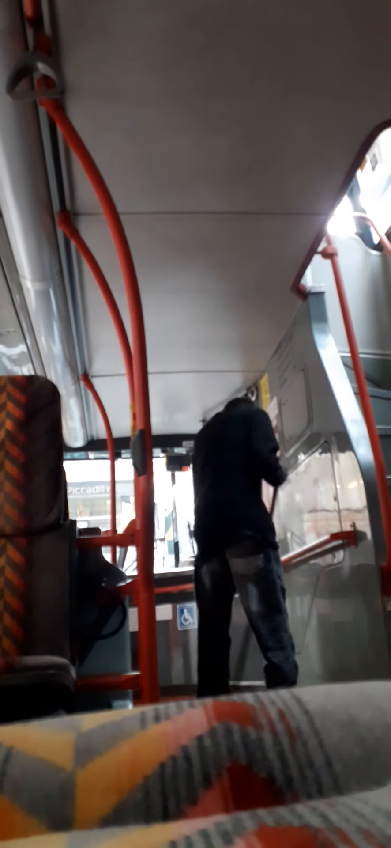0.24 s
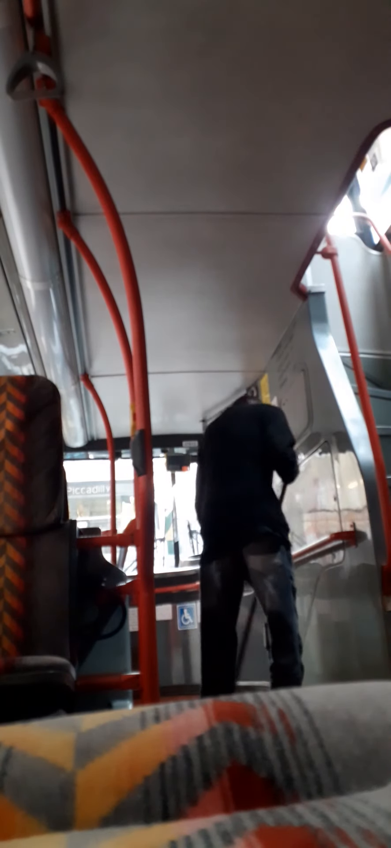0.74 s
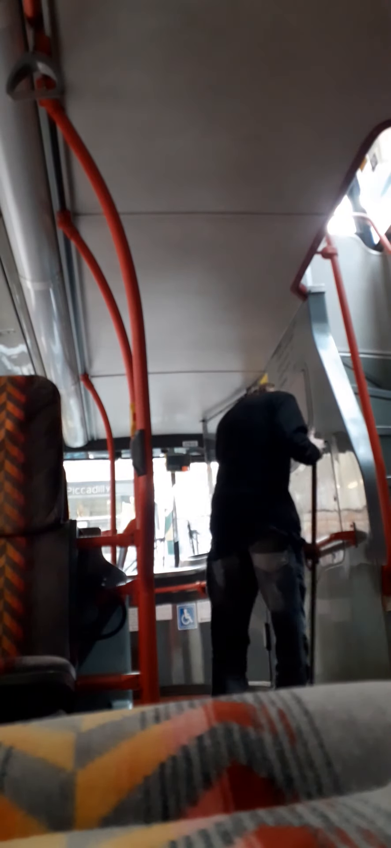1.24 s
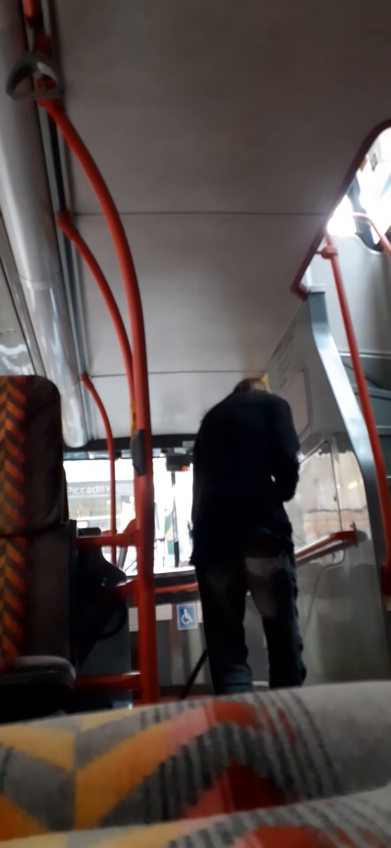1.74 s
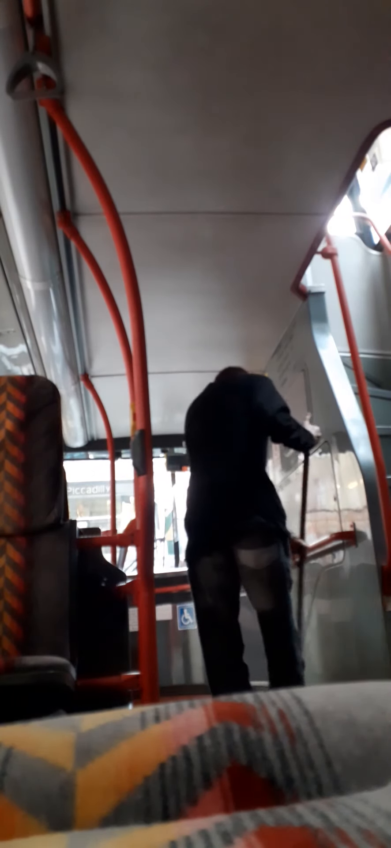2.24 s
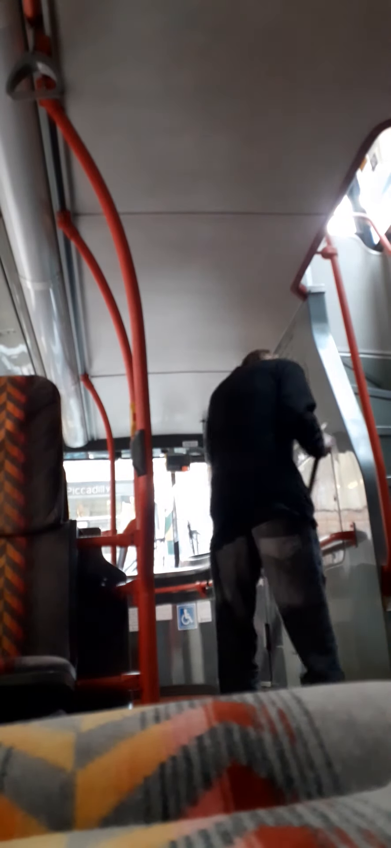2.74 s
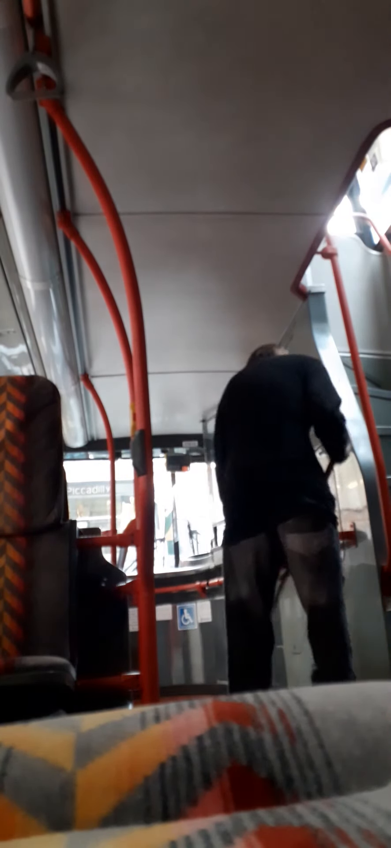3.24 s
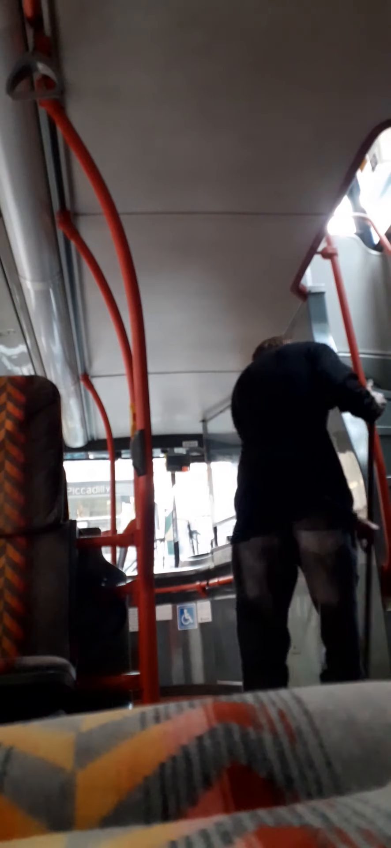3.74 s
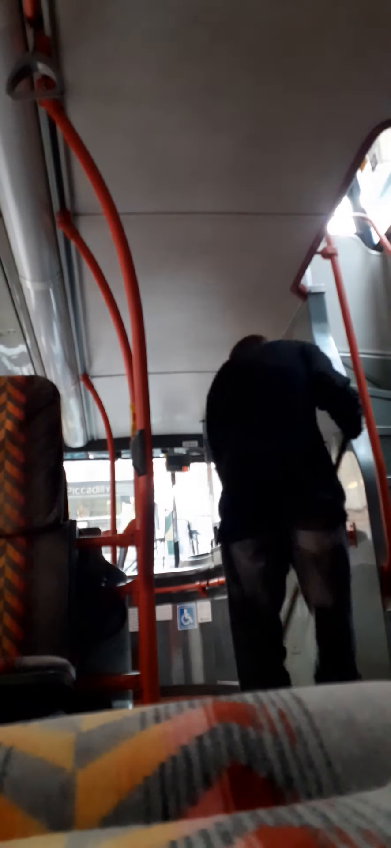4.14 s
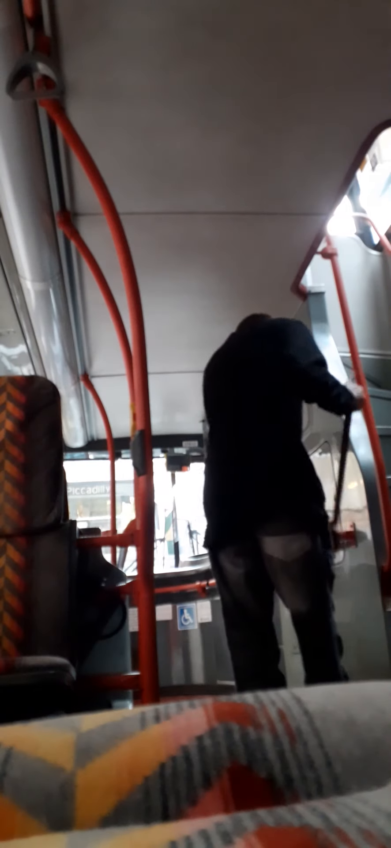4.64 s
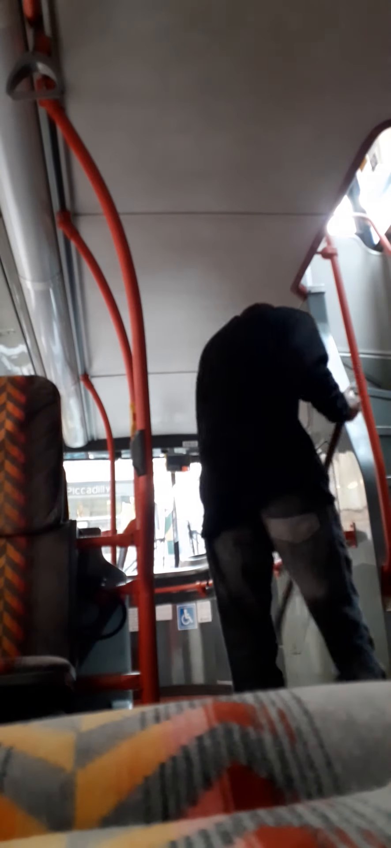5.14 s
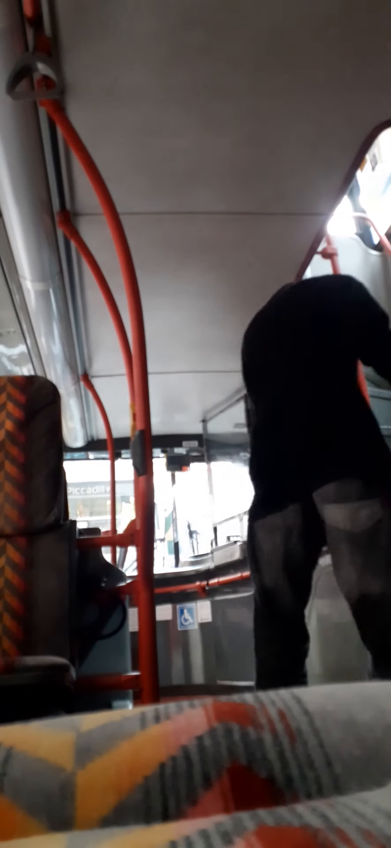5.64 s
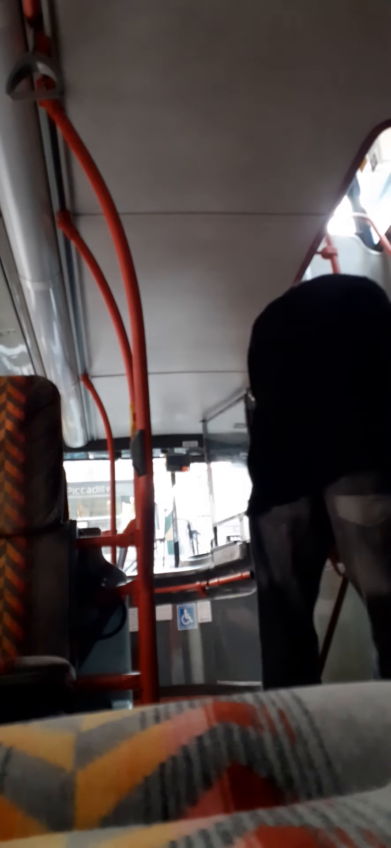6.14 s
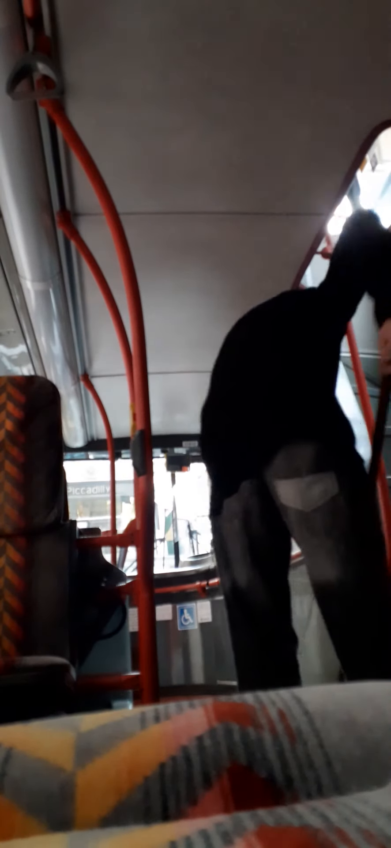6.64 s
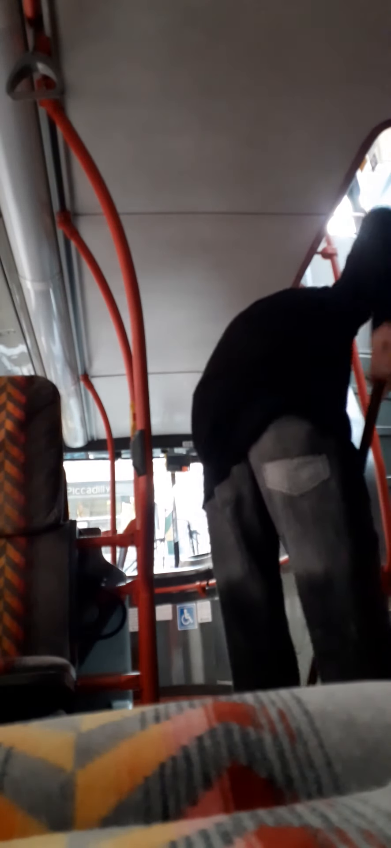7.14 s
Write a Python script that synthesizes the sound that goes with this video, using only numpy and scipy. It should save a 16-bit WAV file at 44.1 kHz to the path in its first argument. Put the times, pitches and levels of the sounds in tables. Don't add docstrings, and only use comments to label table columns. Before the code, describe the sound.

In a still bus cabin with a faint air noise and short, dull echo, a long-handled brush scrubs a wet, gritty floor. From 0 to 3.5 seconds the strokes are quiet and distant, about two per second: soft bristle hiss, a rougher mid scrape, and low hollow rubbing of floor and wall panels, dipping at each turn. Around 3.7 seconds come a few small clicking jolts and squeaks; a calmer stretch follows from 4 to 5. At 5.2 a sharper rattle rings out, and at 5.65 a stronger, nearer scrape with low floor groan. Knocks thump at 5.9, 6.4 and 6.65. At 6.75 the head bites suddenly, very loud, with hiss, scrape, booming panels and brief squeals, trailing off by 7. After a short lull with weight-shift rumble, another loud scrape and rattling jolts hit from 7.3 to the end. Close phone stereo, slightly brighter on the left.

```python
import sys
import numpy as np
from scipy import signal
from scipy.fft import rfft, irfft, next_fast_len
from scipy.io import wavfile
from scipy.ndimage import uniform_filter1d, map_coordinates

SR = 44100
rng = np.random.default_rng(int(sys.argv[2]) if len(sys.argv) > 2 else 0)


def waveform_to_disk(signal):
    frames = np.transpose(np.atleast_2d(signal))
    scaled = np.clip(frames, -1, 1) * 32767
    samples = np.round(scaled).astype(np.int16)
    wavfile.write(sys.argv[1], SR, samples)


def linear_from_db(decibels):
    return 10 ** (np.asarray(decibels, float) / 20)


N = 326335
CONTROL_RATE = 1000


def unit(x):
    return x / np.sqrt(np.mean(x ** 2) + 1e-20)


def along(points, hz):
    f, v = np.transpose(points)
    return np.interp(np.log(hz + 1), np.log(f + 1), v)


def over_time(points):
    s, value = np.transpose(points)
    return np.interp(np.arange(N) / SR, s, value)


def per_sample(control):
    return np.interp(np.arange(N) * CONTROL_RATE / SR, np.arange(len(control)), control)


def wobble(rate):
    knots = rng.standard_normal(int(N * rate / SR) + 4)
    return map_coordinates(knots, [np.arange(N) * rate / SR])


def filtered(x, response):
    m = next_fast_len(N + SR // 2)
    return irfft(rfft(x, m) * response(np.fft.rfftfreq(m, 1 / SR)), m)[..., :N]


def coloured(x, points):
    return filtered(x, lambda f: linear_from_db(along(points, f)))


def slips(rate, spread_db, smooth):
    size = linear_from_db(spread_db * np.clip(rng.standard_normal((2, N)), -2, 2)) * rng.choice([-1, 1], (2, N))
    train = size * (rng.random((2, N)) < rate / SR)
    return unit(train) + smooth * rng.standard_normal((2, N))


def patchy(x, depth_db):
    z = signal.stft(x, nperseg=512)[2]
    field = uniform_filter1d(rng.standard_normal(z.shape[1:]), 5, 0)
    field = uniform_filter1d(field, 8, 1)
    return signal.istft(z * linear_from_db(depth_db * unit(field)), nperseg=512)[1][:, :N]


def steadied(x, span_s, share):
    power = np.abs(uniform_filter1d(unit(x) ** 2, int(span_s * SR), axis=-1))
    return unit(x / np.sqrt(power + 0.012) ** share)


def resonated(x, hz, width_hz):
    return signal.lfilter(*signal.iirpeak(hz, hz / width_hz, SR), x)


def nearest(modes, centre_hz, drive, reach_octaves):
    out = 0
    for k, (hz, width_hz, db) in enumerate(modes):
        distance = np.log2(hz / centre_hz) / reach_octaves
        reach = linear_from_db(-9 * np.minimum(distance ** 2, 1.5))
        out = out + (-1) ** k * linear_from_db(db) * reach * resonated(drive, hz, width_hz)
    return out


def domes(rows, level_db, dip_db, bend):
    s, rise, fall = np.transpose([row[:3] for row in rows])[:, :, None]
    t = np.arange(N * CONTROL_RATE // SR + 2) / CONTROL_RATE - s
    away = np.abs(t) / np.where(t < 0, rise, fall)
    return linear_from_db(np.asarray(level_db)[..., None] - dip_db * away ** np.where(t < 0, bend, bend * 1.13))


def swells(rows, level_db, dip_db, bend):
    return domes(rows, level_db, dip_db, bend).sum(0)


def loading(rows, rest_db, rest_hz):
    level_db, centre_hz = np.transpose(rows)[3:]
    gains = domes(rows, level_db, dip_db=26, bend=1.15)
    total = gains.sum(0) + linear_from_db(rest_db)
    centre = (centre_hz @ gains + rest_hz * linear_from_db(rest_db)) / total
    return per_sample(total), per_sample(centre)


# frequency in Hz, time to die by 60 dB in seconds.
CABIN = [(150, 0.45), (1000, 0.15), (8000, 0.12)]


def cabin(x, wet_db):
    hz, t, z = signal.stft(rng.standard_normal((2, SR // 3)), SR, nperseg=256)
    tail = signal.istft(z * linear_from_db(-60 * t / along(CABIN, hz)[:, None]), SR, nperseg=256)[1]
    wet = signal.fftconvolve(x[None], tail / np.linalg.norm(tail[0]), axes=1)[:, :N]
    return np.array([x + linear_from_db(wet_db) * wet[0], wet[1]])


# frequency in Hz, level in dB per Hz.
AIR = [(15, -51), (25, -8), (326, -23), (416, 5.5), (624, -24), (962, -1), (3920, -17), (8140, -21),
       (9320, -35), (12200, -24), (16000, -14)]


def air():
    return linear_from_db(-51 - 9.5) * unit(coloured(rng.standard_normal((2, N)), AIR))


# frequency in Hz, level in dB per Hz.
CHASSIS = [(20, -36), (40, -3), (58, 3), (90, 4), (130, -36)]
# time in seconds, rise in seconds, fall in seconds, level in dB.
STEPS = [(.02, .2, 0.72, -58), (.85, .2, .7, -68), (2.08, 0.16, 0.13, -51.5), (2.66, 0.14, .2, -51),
         (3.38, 0.15, 0.17, -52), (3.94, 0.86, 0.16, -61), (4.93, .15, 0.2, -65), (5.41, 0.03, 0.17, -50),
         (5.23, .04, .12, -62), (2.3, .12, .12, -62), (5.66, .15, .2, -55), (1.55, .15, .15, -61),
         (5.88, 0.11, 0.41, -51.5), (6.43, 0.14, 0.17, -46.5), (6.65, 0.13, 0.63, -47),
         (7.24, 0.063, .5, -51)]


def chassis():
    sway = swells(STEPS, np.transpose(STEPS)[3], dip_db=26, bend=1.15) + linear_from_db(-87.5)
    rumble = coloured(rng.standard_normal((2, N)), CHASSIS)
    return per_sample(sway) * steadied(rumble, 0.083, share=0.36)


# frequency in Hz, width in Hz, level in dB.
FLOOR_PAN = [(118.8, 9.9, -0.5), (145.7, 5.5, 6.5), (170.4, 15.8, 5.5), (216.7, 23.5, -3), (250, 5.9, 2),
             (285, 25, 7)]
# time, rise and fall in seconds, level in dB,
# centre in Hz.
PRESSES = [(.08, 0.16, 0.086, -41.5, 250), (.0, .05, 0.13, -53, 150), (.33, 0.12, 0.24, -46, 223),
           (.86, 0.23, 0.19, -40, 231), (1.23, 0.36, 0.27, -50, 230), (1.63, 0.26, 0.15, -46.5, 235),
           (2.02, 0.22, 0.31, -46.5, 250), (2.575, 0.25, 0.12, -43, 212), (2.7, 0.032, 0.049, -40, 167),
           (2.87, 0.18, 0.16, -50.5, 228), (3.26, 0.068, 0.22, -35.5, 202), (3.55, 0.087, 0.12, -42, 177),
           (3.85, 0.27, 0.1, -41, 247), (4.78, 0.15, 0.88, -49, 255), (5.21, 0.045, 0.18, -41.5, 250),
           (5.45, 0.33, 0.099, -50, 151), (5.68, 0.14, 0.064, -21.5, 203), (5.78, 0.2, 0.12, -36, 250),
           (5.89, 0.022, 0.083, -33, 184), (6.075, 0.15, 0.16, -26.5, 207), (6.14, 0.04, 0.033, -28, 178),
           (6.3, 0.05, 0.097, -41, 285), (6.44, 0.055, 0.098, -41.5, 177), (6.68, 0.043, 0.2, -15.5, 190.5),
           (6.79, 0.14, 0.13, -19, 206),
           (7.03, 0.08, .08, -43, 195),
    (6.735, .04, 0.035, -17.5, 214),
    (6.53, .1, .12, -50, 220),
    (7.26, 0.02, 0.13, -34, 182),
    (7.34, 0.1, 0.068, -16.5, 206),
    (7.4, 0.064, 0.091, -17, 260),
]


def floor_pan():
    gain, centre_hz = loading(PRESSES, rest_db=-70.5, rest_hz=220)
    pan = nearest(FLOOR_PAN, centre_hz, slips(150, spread_db=6.0, smooth=0.57), reach_octaves=0.31)
    return linear_from_db(-3.5) * gain * steadied(pan, 0.0129, share=1.0)


# frequency in Hz, width in Hz, level in dB.
PANELS = [(353, 26.6, 9), (414.5, 18.4, 11), (501.5, 45, -1), (568, 39, -0.5), (671, 57, 2.5),
          (778, 43, 9.5), (898, 75, 6.5)]
# time, rise and fall in seconds, level in dB, centre in Hz.
RUBS = [(.07, 0.17, 0.066, -35.5, 514), (.41, 0.25, 0.14, -40, 518), (.87, 0.36, 0.19, -37.5, 534),
        (1.23, 0.23, 0.43, -42.5, 538), (1.42, 0.064, 0.081, -52, 520), (1.67, 0.27, 0.11, -44.5, 535),
        (2.02, 0.31, 0.25, -43.5, 542), (2.53, 0.3, 0.11, -37.5, 552), (2.7, 0.03, 0.06, -52, 700),
        (2.92, 0.26, 0.088, -40, 596), (3.31, 0.18, 0.13, -32.5, 563), (3.54, 0.052, 0.15, -40, 573),
        (3.81, 0.26, 0.19, -36, 587), (4.76, 0.11, 0.21, -37.5, 585), (5.21, 0.083, 0.17, -29, 560),
        (5.52, 0.14, 0.2, -40.5, 560), (5.64, 0.077, 0.15, -24, 545), (5.79, 0.18, 0.14, -34.5, 498),
        (6.03, 0.16, 0.22, -34.5, 520), (6.28, 0.14, 0.12, -38, 550), (6.69, 0.07, 0.09, -26, 500),
        (6.76, 0.055, 0.071, -23, 546), (6.86, 0.12, 0.076, -26, 427), (7.37, 0.15, 0.11, -19, 560),
        (5.31, 0.043, 0.07, -43, 540),
    (5.04, 0.13, .14, -44.5, 590),
    (3.225, 0.017, 0.083, -42, 550),
    (6.53, 0.22, 0.67, -47.5, 560),
    (6.96, 0.1, 0.17, -47, 690),
    (7.27, 0.021, 0.055, -39, 240),
    (5.9, 0.018, .06, -46, 510),
    (3.73, 0.069, 0.034, -38, 530),
]


def wall_panels():
    gain, centre_hz = loading(RUBS, rest_db=-63, rest_hz=550)
    panels = nearest(PANELS, centre_hz, slips(600, spread_db=2.5, smooth=0.65), reach_octaves=0.36)
    return linear_from_db(-3.0) * gain * steadied(panels, 0.032, share=0.89)


# start in seconds, length in seconds, first Hz, last Hz,
# level in dB.
SQUEAKS = [(0.039, 0.089, 403, 375, -44.5), (.24, .16, 562, 543, -49.5), (.685, 0.054, 620, 610, -43),
           (.85, 0.051, 513, 516, -39), (3.24, 0.079, 644, 632, -42), (3.28, 0.097, 479, 450, -38),
           (5.184, 0.032, 402, 380, -36.5), (6.75, 0.049, 2156, 2060, -27), (0.804, 0.18, 250, 250, -41),
           (1.967, .09, 249, 236, -42.5), (1.97, 0.075, 698, 691, -47), (2.102, 0.054, 552, 458, -44),
           (2.441, 0.082, 398, 409, -44.5), (3.211, 0.08, 346, 340, -40.5), (3.5, 0.08, 623, 600, -45),
           (3.784, 0.069, 581, 547, -39), (3.785, 0.054, 904, 842, -35), (3.823, 0.064, 1934, 2050, -35),
           (4.681, 0.22, 1696, 2517, -46.5), (4.65, 0.19, 178, 184.5, -56), (5.06, 0.12, 178, 178, -51.5),
           (5.196, 0.068, 1170, 1157, -36), (4.8, 0.35, 283, 281.3, -55), (5.231, 0.074, 544, 541.5, -32.5),
           (5.314, 0.064, 2340, 2620, -42), (5.63, 0.027, 1146, 1138, -27), (5.993, 0.066, 601, 596, -36),
           (6.048, 0.042, 770, 750, -33), (6.078, .09, 417, 394, -38), (6.045, 0.11, 189.6, 178, -30),
           (6.214, 0.068, 458, 655, -40), (6.25, 0.059, 460, 470, -45), (6.28, 0.073, 782, 855, -43.5),
           (6.672, 0.13, 576, 579, -22.5), (6.787, 0.049, 1118, 1114, -21.5),
           (6.803, 0.043, 1616, 1606, -26), (7.342, 0.085, 680.5, 721, -24), (5.615, 0.031, 534, 520, -30),
           (4.686, 0.079, 1490, 2250, -45), (3.42, 0.31, 146.3, 150.8, -53),
           (2.92, .07, 530, 500, -45),
    (2.815, .065, 700, 705, -48),
    (2.885, .05, 630, 600, -46),
    (5.03, .14, 670, 620, -50),
    (7.18, .03, 550, 550, -44),
    (7.25, 0.057, 572, 600, -33.5),
    (6.255, 0.064, 470, 500, -40),
    (6.685, .06, 292, 285, -22),
    (6.76, .06, 220, 215, -18),
]


def squeaks():
    out, t = np.zeros(N + SR), np.arange(SR // 2) / SR
    for s, length, first_hz, last_hz, db in SQUEAKS:
        u = np.clip(t / length, 0, 1)
        hz = first_hz + (last_hz - first_hz) * u ** 0.55
        noise = rng.standard_normal((2, len(t)))
        pitch_scatter, level_scatter = unit(uniform_filter1d(noise, int(14 * SR / first_hz), axis=1))
        roughness = (0.016 + 0.013 * first_hz / 2500) * (last_hz / first_hz) ** 2
        phase = 2 * np.pi * np.cumsum(hz * (1 + roughness * pitch_scatter)) / SR
        swell = linear_from_db(db + 3.4 * level_scatter) * np.sin(np.pi * u ** 0.89)
        out[round(s * SR):][:len(t)] += swell * np.sin(phase)
    return out[:N]


# time in seconds, peak in dB, pitch in Hz, time to die by 60 dB in seconds.
JOLTS = [(0.227, -43, 549, 0.06), (0.591, -40.5, 417, 0.11), (1.413, -40, 590, 0.072),
         (3.063, -44, 630, 0.071), (3.505, -35, 610, 0.065), (3.726, -26, 867, 0.07),
         (3.767, -25, 663, 0.06), (3.793, -29, 587, 0.06), (4.957, -35, 690, 0.04),
         (5.188, -17, 568, 0.054), (5.202, -22, 697, 0.069), (5.249, -25, 560, 0.06),
         (5.272, -29, 550, .05), (5.308, -33, 530, .05), (5.212, -24, 368, .04), (6.003, -22, 435, 0.067),
         (6.02, -24.5, 366, 0.06), (6.222, -23, 468, 0.06), (6.69, -20, 450, 0.05), (6.715, -24, 570, 0.06),
         (6.753, -15, 590, 0.039), (6.784, -16, 353, 0.053), (7.256, -35, 534, 0.043),
         (7.335, -8.5, 486, 0.064), (7.344, -15, 595, 0.051), (7.357, -10, 684, 0.05),
         (7.378, -16, 363, 0.067)]


def jolts():
    out, t = np.zeros(N + SR), np.arange(SR // 4) / SR
    for s, db, hz, t60 in JOLTS:
        turn = 2 * np.pi * hz * t
        ring = np.sin(turn) + 0.47 * np.sin(1.37 * turn) + 0.34 * np.sin(0.703 * turn)
        onset = 1 - np.exp(-t / 0.00076)
        out[round(s * SR):][:len(t)] += linear_from_db(db - 4.5 - 60 * t / t60) * ring * onset
    return out[:N]


# time in seconds, peak in dB, pitch in Hz, time to silence in seconds, tap in dB.
KNOCKS = [(0.17, -43.5, 161, 0.076, -16), (2.674, -30.5, 179, 0.051, -22), (3.492, -42, 207.5, 0.06, -10),
          (5.407, -30, 159, 0.044, -14), (5.6, -28.5, 110, 0.17, -20), (5.87, -24, 185, 0.063, -3),
          (6.393, -28.5, 176, 0.096, -12), (6.614, -26, 201.5, 0.1, -2), (6.647, -13, 181.6, 0.1, -12),
          (6.942, -27.5, 169, 0.054, -12), (6.16, -25, 178, .035, -15), (6.195, -33, 180, .03, -12),
          (7.233, -31.5, 209, 0.15, -21), (2.73, -48, 108, .09, -25), (4.96, -55, 120, 0.11, -25),
          (5.985, -43, 105, 0.11, -25), (6.24, -49, 100, .09, -25), (7.25, -34, 112, 0.22, -25),
          (7.31, -35, 112, .15, -25)]


def knocks():
    out, t = np.zeros(N + SR), np.arange(SR // 2) / SR
    for s, db, hz, life, tap_db in KNOCKS:
        turn = 2 * np.pi * hz * t
        ring = np.sin(turn) + 0.24 * np.sin(1.23 * turn) + 0.15 * np.sin(0.8 * turn)
        ring = ring * linear_from_db(-60 * (t / life) ** 2)
        tap = linear_from_db(tap_db - 60 * t / 0.033) * (np.sin(2.5 * turn) + 1.1 * np.sin(3.4 * turn))
        onset = 1 - np.exp(-(t / 0.0036) ** 2)
        out[round(s * SR):][:len(t)] += linear_from_db(db - 2.0) * (ring + tap) * onset
    return out[:N]


# time in seconds, slowing in seconds, restart in seconds,
# loss of hiss and scrape in dB, loss of body rumble in dB.
TURNS = [(.2, 0.029, 0.022, 4, 5), (.57, .04, 0.032, 5, 5), (1.06, 0.047, 0.021, 3.5, 0.5),
         (1.39, .03, .02, 3.5, 1.5), (1.45, 0.023, 0.042, 5.5, 1.5), (1.81, 0.037, .02, -1, 9),
         (2.25, .05, 0.054, 4.5, 4.5), (2.665, .03, .015, 2, 4), (3.05, .03, 0.021, 3, -3),
         (3.475, 0.045, 0.035, 7, 3), (3.6, .04, 0.078, 2, 1), (4.49, 0.048, 0.027, 6, -1),
         (4.94, 0.064, 0.031, 5, 0), (5.4, .03, .015, -1, 2), (5.86, .02, .012, 0.5, 6),
         (6.2, .03, .015, 2, -1.5), (6.59, 0.036, 0.022, -3, 0.5), (7.02, 0.054, 0.031, 3, 5.5),
         (7.226, 0.02, 0.02, -2, 11)]


def pauses():
    near = domes(TURNS, 0, dip_db=9, bend=2.8)
    brush_db, body_db = np.transpose(TURNS)[3:] @ near
    return linear_from_db(-per_sample(brush_db)), linear_from_db(-per_sample(body_db))


# time of top speed in seconds, speeding up in seconds,
# slowing down in seconds, bristle hiss in dB, head scrape in dB.
STROKES = [(0.039, 0.45, 0.13, -49, -42.5), (.38, 0.17, 0.18, -48, -37), (0.821, 0.28, 0.26, -48.5, -38),
           (1.24, 0.2, 0.15, -51.5, -39), (1.55, 0.22, 0.15, -55.5, -43.5), (1.68, 0.28, 0.12, -48, -43),
           (2.02, 0.073, 0.035, -63, -39), (2.08, 0.28, 0.15, -48.5, -42.5), (2.52, 0.28, 0.13, -46.5, -35),
           (2.877, .22, 0.14, -52, -37), (3.225, 0.024, 0.068, -71, -46), (3.3, 0.27, 0.15, -45.5, -34.5),
           (3.72, 0.4, 0.15, -52, -41), (3.86, 0.28, 0.063, -53.5, -35), (4.23, 0.45, 0.25, -52, -42),
           (4.705, 0.019, 0.088, -79, -42.5), (4.785, 0.27, 0.14, -51, -40),
           (5.181, 0.15, 0.16, -51, -40.5), (5.33, 0.64, 0.069, -56.5, -41.5),
           (5.67, 0.27, 0.18, -45.5, -29), (5.81, 0.11, 0.056, -61, -36), (6.08, 0.3, 0.32, -54, -38),
           (6.325, 0.13, 0.058, -58.5, -39), (6.561, 0.34, 0.065, -58.5, -46.5),
           (6.731, 0.16, 0.059, -54, -37.5), (6.945, .05, 0.022, -79, -44), (7.16, 0.31, 0.1, -58, -44.5),
           (7.41, 0.19, .2, -45, -19)]
HARD_STROKE = [
    (6.757, 0.012, 0.12, -28, -18),
    (6.825, 0.12, 0.16, -35.5, -22),
]
# time in seconds, level in dB.
WETNESS = [(0, 0), (.8, -1.5), (1.25, 1), (1.65, -3), (2.5, -2.5), (2.9, 4.5), (3.3, -4), (3.7, -2.5),
           (4.2, 1.5), (5.7, -2), (6.1, 2.5), (6.3, -12), (6.6, 0.2), (7.4, -4)]
# time, rise and fall in seconds, level in dB.
SQUIRTS = [
    (2.0, 0.076, 0.13, -51),
    (3.68, 0.19, 0.084, -60),
    (5.64, 0.059, 0.13, -58),
]


def stroke_gains():
    hiss_db, scrape_db = np.transpose(STROKES)[3:]
    hard_hiss_db, hard_scrape_db = np.transpose(HARD_STROKE)[3:]
    hiss = swells(STROKES, hiss_db, dip_db=25, bend=2.01)
    hiss = hiss + swells(HARD_STROKE, hard_hiss_db, dip_db=25, bend=1.33)
    scrape = swells(STROKES, scrape_db, dip_db=28, bend=1.415)
    scrape = scrape + swells(HARD_STROKE, hard_scrape_db, dip_db=19.9, bend=1.33)
    sizzle_db = -54
    film_db = sizzle_db + 0.57 * (hiss_db - np.median(hiss_db))
    film = swells(STROKES, film_db, dip_db=20, bend=2.1)
    film = film + swells(HARD_STROKE, [sizzle_db + .2], dip_db=26, bend=1.33)
    squirts = swells(SQUIRTS, np.transpose(SQUIRTS)[3], dip_db=20, bend=2.1)
    sizzle = per_sample(film) * linear_from_db(over_time(WETNESS)) + per_sample(squirts)
    return per_sample(hiss), per_sample(scrape), sizzle


# frequency in Hz, level in dB per Hz.
BRISTLES = [(200, -15), (350, -8), (560, 1.5), (900, 1.5), (1900, 3.5), (3500, -4.5), (5000, -5),
            (7000, -16), (8600, -11), (10500, -29.5), (15800, -23.5)]
# frequency in Hz, level in dB per Hz.
SIZZLE = [(8000, -5), (10000, -7.5), (12000, -5.5), (13500, -7), (15000, -10), (16000, -6.5)]
# frequency in Hz, level in dB per Hz.
HEAD = [(410, -33), (700, -21), (860, -12.5), (1000, 1), (1120, 0.5), (1300, 0), (1630, 1.5), (2100, -3.5),
        (2700, -10), (4200, -18.5), (5500, -21.5), (8500, -59), (11000, -64)]
# time in seconds, jump in dB, fade in seconds.
CATCH = (6.748, 4.4, 0.014)


def brush():
    hiss_gain, scrape_gain, sizzle_gain = stroke_gains()
    flicks = patchy(slips(8000, spread_db=3.5, smooth=1.86), depth_db=1.22)
    hiss = coloured(flicks, BRISTLES)
    sizzle = coloured(flicks, SIZZLE)
    chatter = patchy(slips(4000, spread_db=7.5, smooth=0.8), depth_db=1.0)
    left, right = coloured(chatter, HEAD)
    scrape = np.array([cabin(left, wet_db=-3.5)[0], cabin(right, wet_db=-4.0)[0]])
    judder = wobble(35)
    catch_s, jump_db, fade_s = CATCH
    since = np.arange(N) / SR - catch_s
    bite_db = jump_db * (since > 0) * np.exp(-np.abs(since) / fade_s)
    bristles = linear_from_db(6.5) * hiss_gain * unit(hiss) + linear_from_db(3.0) * sizzle_gain * unit(sizzle)
    head = scrape_gain * unit(scrape)
    return linear_from_db(bite_db + 0.68 * judder) * bristles + linear_from_db(bite_db - 2.0 + 0.83 * judder) * head


# frequency in Hz, likeness from 0 to 1.
ALIKE_FAR = [(60, 0.9), (250, 0.96), (520, 0.96), (750, 0.74), (1050, 0.13), (1700, 0.039), (2400, 0.079),
             (3600, 0.39), (9000, 0.11)]
# frequency in Hz, likeness from 0 to 1.
ALIKE_NEAR = [(60, 1), (250, 1), (520, 0.97), (750, 0.69), (1050, 0.25), (1700, 0.56), (2400, 0.07),
              (3600, 0.3), (9000, 0.065)]
# frequency in Hz, lead in radians.
LEAD = [(30, .02), (780, 0.32), (1550, 3.67), (2410, 4.3), (3620, 11.5), (6000, 17.74)]


def ports(paths):
    def mix(f):
        share = np.clip([along(ALIKE_FAR, f), along(ALIKE_NEAR, f)], 0, 1)
        return np.array([share * np.exp(-1j * along(LEAD, f)), np.sqrt(1 - share ** 2)])
    return filtered(paths[:, None], mix).sum(axis=0)


# time in seconds, share of near sound from 0 to 1.
NEARNESS = [(0, 0.4), (4.8, 0.16), (5.6, 0.6), (7.4, 0.7)]


def scene():
    brush_gain, body_gain = pauses()
    bodywork = chassis() + floor_pan() + wall_panels()
    rings = cabin(knocks() + jolts() + squeaks(), wet_db=-28.0)
    paths = air() + body_gain * bodywork + rings + brush_gain * brush()
    near = over_time(NEARNESS)
    from_far, from_near = ports(paths)
    return np.array([paths[0], near * from_near + (1 - near) * from_far])


# frequency in Hz, left over right in dB.
LEFT_OVER_RIGHT = [(40, 4), (99, 6), (160, 3.5), (270, 2.5), (450, 4.5), (740, 0), (1220, 2.5), (2010, 7),
                   (3330, 14.5), (5500, 6.5), (9080, 6), (15000, 5.5)]


def port_colour(f):
    cavity = 1j * f * 1900 / (9070 ** 2 - f * f + 1j * f * 1900)
    notch = 1 - np.array([[.55], [.85]]) * cavity
    low_cut = (1j * f / (45 + 1j * f)) ** 2
    balance_db = along(LEFT_OVER_RIGHT, f) * np.array([[.5], [-.5]]) + 1.0
    return linear_from_db(balance_db) * notch * low_cut


def top_cut(x):
    return signal.sosfilt(signal.butter(12, 16670, fs=SR, output="sos"), x)


def record(dry):
    heard = filtered(dry, port_colour)
    heard = heard / (1 + np.abs(heard / .95) ** 4) ** .25
    mix = filtered(heard, lambda f: f < 15790)
    return top_cut(mix)


dry = scene()
out = record(dry)
waveform_to_disk(out)
```